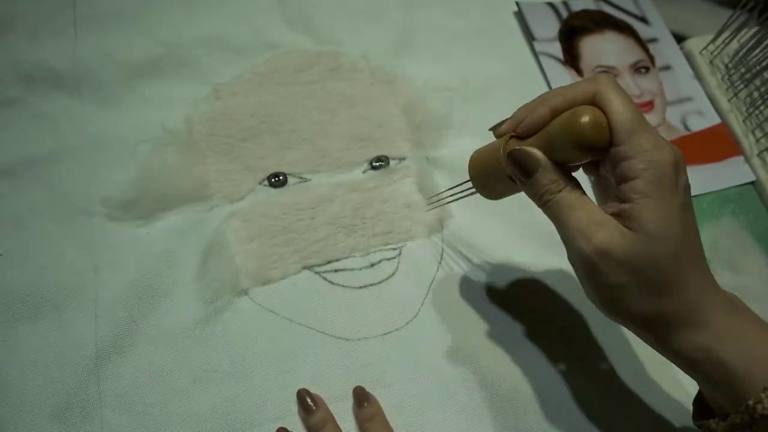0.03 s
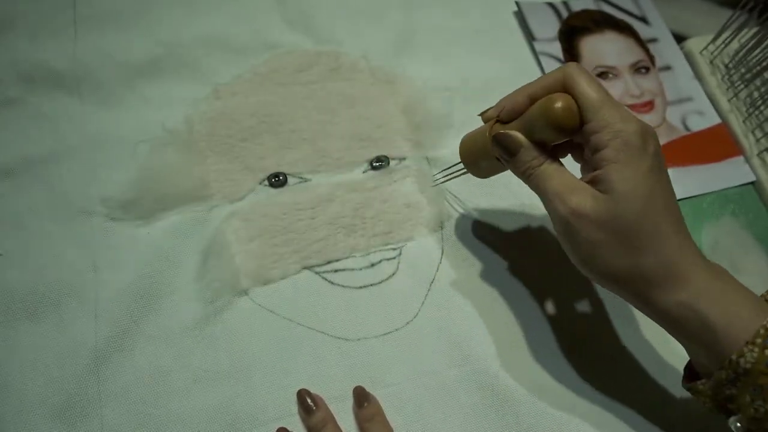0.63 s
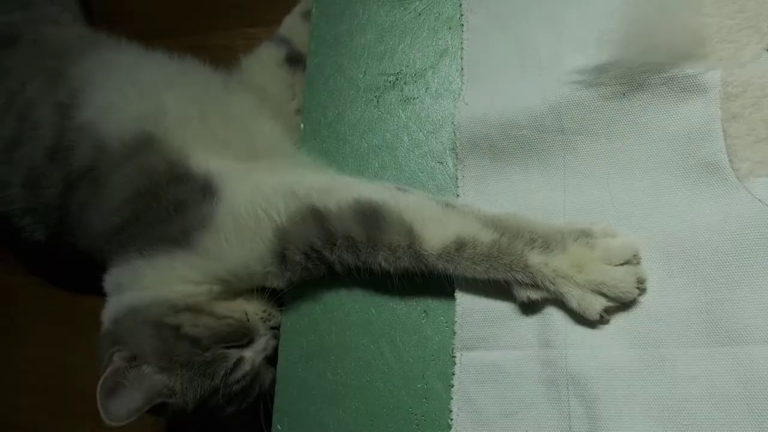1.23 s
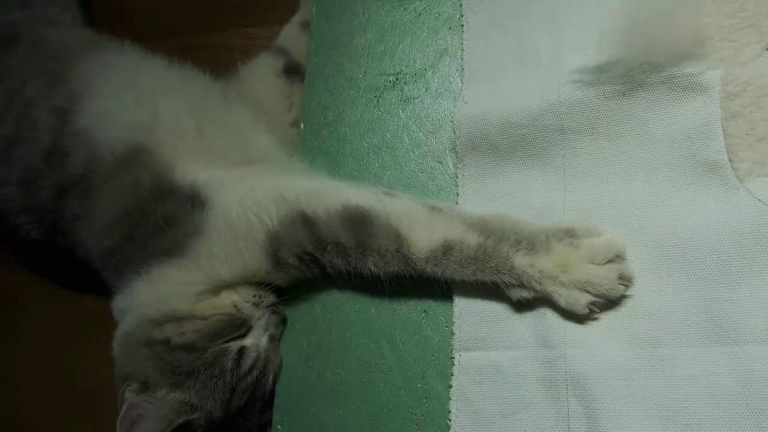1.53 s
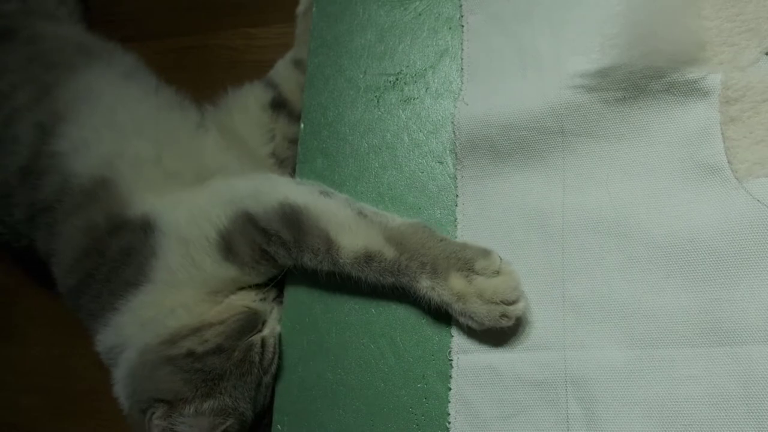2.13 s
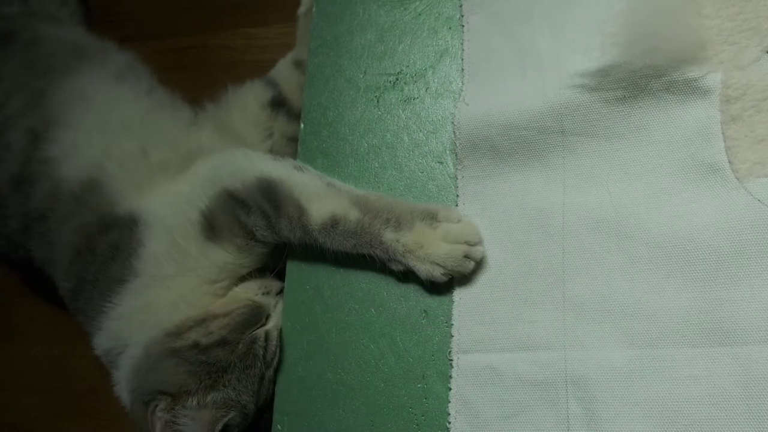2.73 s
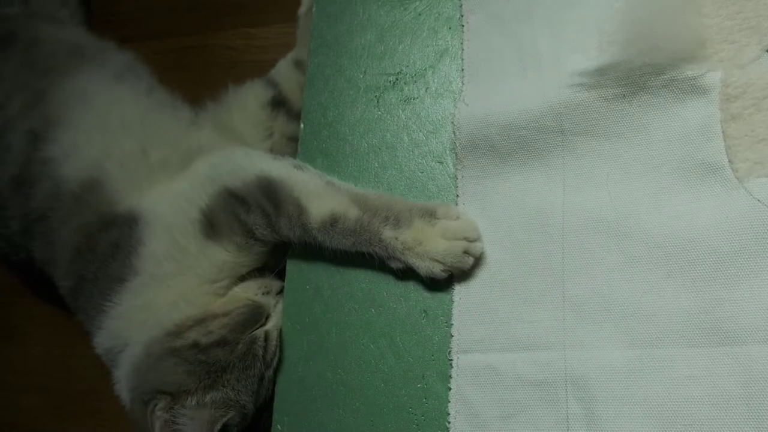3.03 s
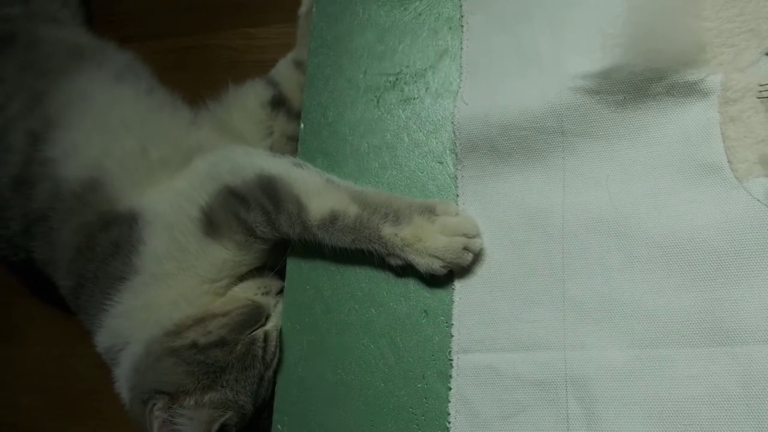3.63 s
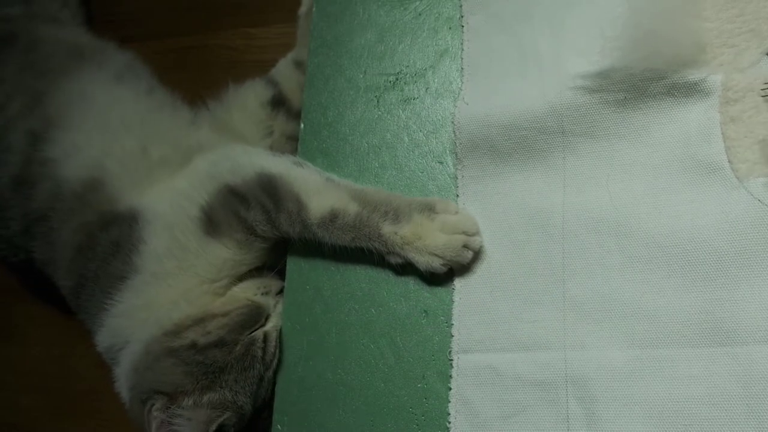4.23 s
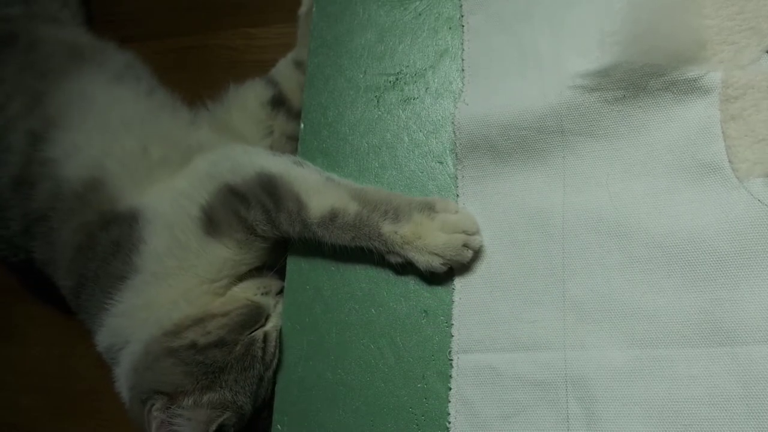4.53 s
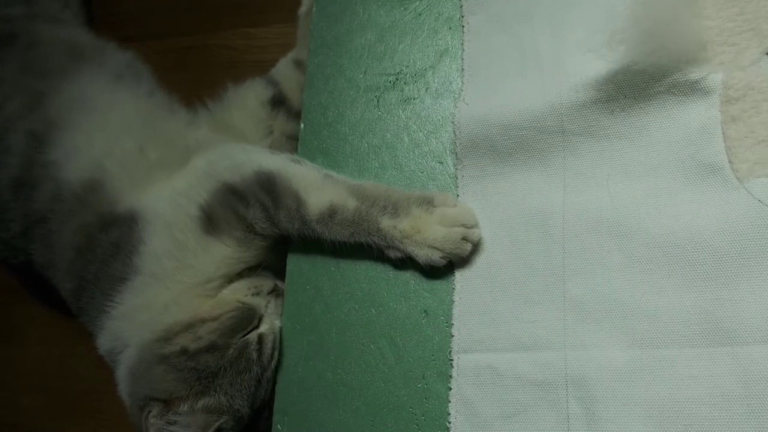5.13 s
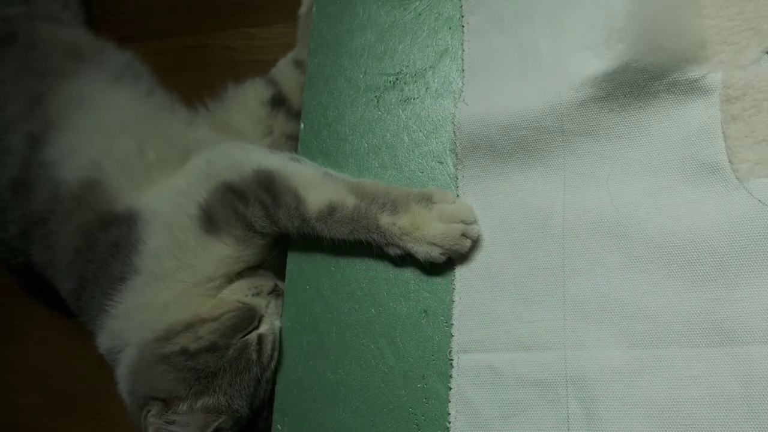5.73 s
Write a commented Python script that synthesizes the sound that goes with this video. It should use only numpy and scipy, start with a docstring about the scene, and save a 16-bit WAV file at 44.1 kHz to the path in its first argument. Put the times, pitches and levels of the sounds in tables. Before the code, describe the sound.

Close, crunchy punches of felting needles into wool and cloth on a soft pad, repeating evenly in a quiet room.

```python
"""A table in a quiet room, microphone close to a multi-needle felting tool punched through wool and cloth
into a soft pad. Over faint room noise, five sped-up, high-pitched stabs come first. Slower strokes follow:
a crunch of breaking fibres and a snap as the cloth gives, a rasp of barbs on the way out, a tick as the
needles spring free. After a second the tool moves to another spot, and the cloth shifts now and then.
A few faint squeaks come in the second half; at the end the strokes weaken and the room noise fades."""
import sys
import numpy as np
from scipy import signal
from scipy.fft import rfft, irfft
from scipy.io import wavfile

SR = 44100
rng = np.random.default_rng(int(sys.argv[2]) if len(sys.argv) > 2 else 0)


def inscribe(sig):
    """Save sig as 16-bit PCM at rate SR to the path in sys.argv[1].

    A 1-D sig is mono; a 2-D sig holds one channel per row.
    Samples are clipped to [-1, 1] before scaling.
    """
    pcm = np.round(np.clip(np.atleast_2d(sig).T, -1, 1) * 32767)
    wavfile.write(sys.argv[1], SR, pcm.astype(np.int16))


N = 264600
T = np.arange(N) / SR
NEW_SPOT_S = 1.11  # the tool moves from the first spot on the pad to the second

# Levels in the tables are relative; each source sets its own gain.
# colour of the room noise and the walls' tail: f/Hz, level/dB
ROOM_COLOUR = [(25, -12), (100, -8.5), (200, -5.5), (300, -4), (400, -2), (550, -3), (800, 0.5), (1100, -5),
               (1600, -15.5), (2400, -21), (5000, -22.5), (9000, -24.5), (15500, -27.5)]
# the quick stabs: first t/s, spacing/s, level/dB of each
QUICK_START_S, QUICK_EVERY_S, QUICK_DB = 0.0206, .0615, [-30.5, -30.5, -29.5, -28.5, -30.5]
# colour of the sped-up, high-pitched stabs: f/Hz, level/dB
QUICK_STAB_COLOUR = [(30, -35), (130, -36), (230, -22), (310, -19), (600, -7.5), (1000, -6.5), (1350, 0.5),
                     (2200, -3), (3200, -3.5), (4000, -10.5), (5700, -7.5), (7500, -12.5), (10000, -19),
                     (15500, -21.5)]
# resonances of the sped-up stabs: f/Hz, width/Hz, level/dB
QUICK_STAB_MODES = [(1420, 71, 2.4), (1910, 54, 1.4), (2170, 110, 3.7), (2590, 130, 6.4), (2670, 170, 4.3),
                    (2920, 18, 7.2), (3270, 27, 5), (3570, 70, 7.9), (4570, 130, 6.2), (5500, 130, 2.8)]
# colour of the barbs' hiss in the sped-up stabs: f/Hz, level/dB
QUICK_BARB_COLOUR = [(3000, -13.5), (6000, 10), (10000, -9), (15500, -11)]
# the slower strokes, in and out: start t/s, push length/s, crunch level/dB, drag level/dB
STROKES = [(0.369, 0.019, -32.5, -52), (0.575, 0.023, -31.5, -45), (0.776, 0.023, -32.5, -46.5),
           (0.968, 0.021, -32.5, -47.5), (1.365, 0.024, -38, -53), (1.622, 0.029, -35.5, -50.5),
           (1.878, 0.033, -40, -54), (2.12, 0.038, -35.5, -47), (2.358, 0.04, -38.5, -47.5),
           (2.604, 0.042, -40.5, -51.5), (2.856, 0.042, -37, -47), (3.103, .04, -36.5, -48.5),
           (3.366, 0.041, -36.5, -46.5), (3.63, 0.037, -37, -52), (3.89, 0.036, -38, -51),
           (4.132, 0.039, -37.5, -48), (4.395, 0.04, -45.5, -56), (4.644, 0.038, -38, -48),
           (4.897, 0.042, -37, -47.5), (5.143, 0.032, -38, -53.5), (5.382, 0.042, -41, -52),
           (5.628, 0.037, -44, -58), (5.872, 0.036, -49, -73.5)]
# colour of pad and table at the first spot: f/Hz, level/dB
FIRST_SPOT_COLOUR = [(30, -41), (60, -23.5), (100, -6), (180, -10.5), (300, -10.5), (450, 2), (750, -0.5),
                     (1000, -5), (1600, -3), (2100, -9.5), (2900, -17), (3800, -17), (7000, -26.5),
                     (15000, -27.5)]
# their resonances: f/Hz, width/Hz, level/dB
FIRST_SPOT_MODES = [(225, 10, 1), (442, 81, 7.6), (736, 310, 1.1), (804, 74, 3), (960, 43, 7.1),
                    (1350, 37, 1.9), (1600, 41, 1), (2580, 180, 1.9)]
# colour of pad and table at the second spot: f/Hz, level/dB
SECOND_SPOT_COLOUR = [(30, -36.5), (70, -19), (125, -9.5), (190, 1), (290, -6.5), (450, 1.5), (700, -5),
                      (980, -10), (1450, -0.5), (1760, -17), (2150, -10.5), (2800, -30.5), (5000, -38.5),
                      (15000, -47.5)]
# their resonances, also rung by every snap: f/Hz, width/Hz, level/dB
PAD_MODES = [(193.7, 24, 4.1), (361, 24, 2.7), (504, 138, 4.9), (583, 5, 2.6), (762, 210, 8.2),
             (1117, 380, 5.3), (1613, 54, 5.6), (1985, 360, 7)]
# colour of the barbs' hiss: f/Hz, level/dB
BARB_COLOUR = [(1200, -5), (2400, 7.5), (3200, 4), (3900, 4.5), (5700, 0), (7500, -7.5), (10000, -10.5),
               (15500, -7.5)]
# its resonances on the way in: f/Hz, width/Hz, level/dB
BARB_MODES = [(4000, 430, 4.7), (6250, 130, 6.9), (8180, 600, 7.1)]
# the cloth gives way clearly under a needle: t/s, level/dB
CLEAR_SNAPS = [(0.3794, -11), (0.5832, -16.5), (0.991, -18.5), (1.3798, -25), (1.8875, -21), (1.8917, -5.5),
               (1.912, -29.5), (2.3715, -19), (2.6155, -18), (2.6191, -8.5), (2.8677, -20), (3.1115, -16.5),
               (3.3785, -16.5), (3.6439, -9), (3.9015, -13), (4.1516, -24.5), (4.4037, -17.5), (4.409, -8),
               (4.6551, -19), (4.9198, -23.5), (5.1643, -19), (5.3939, -26), (5.6394, -25.5)]
# colour of a snap's thump: f/Hz, level/dB
SNAP_COLOUR = [(40, -14), (110, 0), (200, 1.5), (330, 2), (550, 6.5), (850, -6), (1400, 1), (2000, -7.5),
               (2800, -8.5), (5000, -44), (15000, -43.5)]
# colour of threads tearing in a snap: f/Hz, level/dB
THREAD_COLOUR = [(1500, -15), (2800, -5), (4300, 6.5), (6000, 1.5), (8500, -12.5), (15500, -12)]
# a needle catches and springs free clearly: t/s, level/dB
CLEAR_TICKS = [(1.2352, -59), (1.487, -47), (1.737, -38.5), (2.2558, -51), (2.749, -48), (3.004, -45),
               (3.2535, -47), (3.7679, -44), (5.0406, -43), (5.2774, -48.5)]
# colour of a needle's tick: f/Hz, level/dB
TICK_COLOUR = [(300, 2), (1500, 8.5), (2500, -5.5), (3500, -4), (4800, 0.5), (6200, -5), (8000, -10),
               (15000, -19.5)]
# brief ringing of the thin needles: f/Hz, width/Hz, level/dB
NEEDLE_MODES = [(3870, 200, 0), (4530, 220, 6.5), (5720, 300, 2)]
# cloth sliding over the pad: middle t/s, half length/s, level/dB
SLIDES = [(1.217, 0.024, -65), (1.543, 0.026, -55), (1.594, 0.039, -51.5), (1.7, .03, -57),
          (2.206, 0.018, -50)]
# colour of the sliding cloth: f/Hz, level/dB
CLOTH_COLOUR = [(100, -20), (400, 0), (620, 4), (950, 0.5), (1300, -5), (1650, -10), (2050, -4.5),
                (2700, -22.5), (4000, -25), (8000, -32), (15000, -38)]
# faint squeaks: t/s, length/s, start f/Hz, end f/Hz, level/dB
SQUEAKS = [(3.352, 0.035, 2100, 2054, -57.5), (5.282, 0.037, 413, 350, -60.5),
           (5.333, .055, 370, 425, -61.5), (5.432, 0.044, 597, 694, -62)]


def undb(db):
    """Decibels to gain."""
    return 10 ** (np.asarray(db) / 20)


def add(out, s, sound):
    """Mix a sound in from time s."""
    i = max(int(s * SR), 0)
    out[i:i + len(sound)] += sound[:max(N - i, 0)]


def response(colour, modes=(), pitch=1, size=4096):
    """Causal impulse response of unit energy from a smooth spectrum and its resonances."""
    hz = np.maximum(np.fft.rfftfreq(size, 1 / SR), 1) / pitch
    colour_hz, colour_db = np.transpose(colour)
    db = np.interp(np.log(hz), np.log(colour_hz), colour_db)
    for centre, width, peak_db in modes:
        db = db + peak_db / (1 + (2 * (hz - centre) / width) ** 2)
    cepstrum = irfft(np.log(undb(db)))[:size // 2]
    cepstrum[1:] *= 2  # minimum phase
    ring = irfft(np.exp(rfft(cepstrum, size)))[:size // 2]
    return ring / np.linalg.norm(ring)


def through(force, ring):
    """Play a force through an impulse response."""
    return signal.fftconvolve(force, ring)[:N]


def waver(step_s):
    """A random level that glides to a new value every step."""
    knots = np.arange(0, N / SR + step_s, step_s)
    return np.interp(T, knots, rng.standard_normal(N)[:len(knots)])


def fibres(rate, spread_db):
    """Tiny slips of random size at a mean rate per second; rms 1."""
    slips = (rng.random(N) < rate / SR) * rng.choice([-1, 1], N)
    slips = slips * undb(spread_db * np.clip(rng.standard_normal(N), -2, 2))
    return slips / np.std(slips)


def push(s, length, rise_s, fall_s, sag_db):
    """Friction of one stab: it builds smoothly, sags as the hand slows, and dies when the needles stop."""
    t = np.arange(int((length + 10 * fall_s) * SR)) / SR
    build = np.sin(np.pi / 2 * np.minimum(t / rise_s, 1)) ** 2
    sag = undb(sag_db * (np.minimum(t / length, 1) - .5))
    stop = np.exp(-np.maximum(t - length, 0) / fall_s)
    out = np.zeros(N)
    add(out, s, build * sag * stop)
    return out


def swell(s, half_s):
    """A bell-shaped rise and fall around time s."""
    t = np.arange(int(6 * half_s * SR)) / SR - 3 * half_s
    out = np.zeros(N)
    add(out, s + t[0], np.exp(-(t / half_s) ** 2))
    return out


def room(quick_end_s=.305, dip_s=0.35, dip_db=-18.5, fade_from_s=5.35, fade_db_per_s=28):
    """Soft, wavering room noise, pitched up under the quick stabs; it dips once and fades at the end."""
    low = through(rng.standard_normal(N), response(ROOM_COLOUR))
    high = through(rng.standard_normal(N), response(ROOM_COLOUR, pitch=4))
    dip = np.interp(T - NEW_SPOT_S, [0, dip_s], [dip_db, 0], left=0)
    fade = fade_db_per_s * np.maximum(T - fade_from_s, 0)
    level = undb(-61.5 + dip - fade - waver(step_s=0.17))
    return level * np.where(T < quick_end_s, undb(1.4) * high, low)


def quick_stabs(length_s=0.0081, lead_s=0.0011, pull_after_s=0.028):
    """The in-and-out stroke sped up about fourfold, and so higher: fibres crunch, then barbs hiss."""
    strokes = [(QUICK_START_S + QUICK_EVERY_S * k, db) for k, db in enumerate(QUICK_DB)]
    force = sum(undb(db) * push(s - lead_s, length_s, rise_s=0.0052, fall_s=0.0027, sag_db=-7)
                for s, db in strokes)
    drag = sum(undb(db) * swell(s + pull_after_s, half_s=0.0069) for s, db in strokes)
    slips = (force + undb(-19) * drag) * fibres(rate=12000, spread_db=4)
    crunch = through(slips, response(QUICK_STAB_COLOUR, QUICK_STAB_MODES))
    barbs = through(drag * fibres(rate=15000, spread_db=3), response(QUICK_BARB_COLOUR))
    return undb(1.5) * crunch + undb(-30.5) * barbs


def pad(force):
    """The pad rings with the modes of the spot that is being worked."""
    first = through(force * (T < NEW_SPOT_S), response(FIRST_SPOT_COLOUR, FIRST_SPOT_MODES))
    second = through(force * (T >= NEW_SPOT_S), response(SECOND_SPOT_COLOUR, PAD_MODES))
    return first + second


def stabs(lead_s=0.0034, first_barb_db=-16, second_barb_db=-18.5):
    """Barbs tear through fibres: fine slips hiss at first touch, coarse ones shake the loaded pad."""
    force = sum(undb(db) * push(s - lead_s, length + lead_s, rise_s=0.017, fall_s=0.0093, sag_db=-6)
                for s, length, db, _ in STROKES)
    rub = sum(undb(db) * push(s - lead_s, length + lead_s, rise_s=0.0089, fall_s=0.009, sag_db=-4.5)
              for s, length, db, _ in STROKES)
    crunch = pad(force * fibres(rate=2400, spread_db=2))
    barb_db = np.where(T < NEW_SPOT_S, first_barb_db, second_barb_db)
    catch = undb(barb_db + 0.71 * waver(step_s=0.0018))  # the barbs catch and slip in bunches
    barbs = through(catch * rub * fibres(rate=3200, spread_db=5.5), response(BARB_COLOUR, BARB_MODES))
    return undb(1.49) * crunch + barbs


def echoes(tool, table_s=0.003383, table_db=-15, walls_s=.012, tail_t60_s=0.52, tail_db=-33):
    """The table top throws the sound straight back at the microphone; the walls add a faint, dull tail."""
    table = np.interp(T - table_s, T, tool, left=0)
    t = np.arange(SR // 2) / SR
    scatter = rng.standard_normal(len(t)) * (t > walls_s) * undb(-60 * t / tail_t60_s)
    tail = signal.fftconvolve(scatter, response(ROOM_COLOUR))
    walls = through(tool, tail / np.linalg.norm(tail))
    return undb(table_db) * table + undb(tail_db) * walls


def soft_snaps(count=2, after_s=.008, window_s=0.019, lift_db=6.5, scatter_db=3.5):
    """Single needles break through at chance moments of each push; returns rows of t/s, level/dB."""
    chance = rng.random((len(STROKES), count, 2))
    return [(s + after_s + window_s * when, db + lift_db + scatter_db * (2 * size - 1))
            for (s, _, db, _), needles in zip(STROKES, chance) for when, size in needles]


def snaps(slip_s=0.000358, load=0.59, tear_s=0.00091):
    """The stretched cloth tugs the pad and lets go a moment later, amid a burst of tearing threads."""
    ring = response(SNAP_COLOUR, PAD_MODES)
    t = np.arange(len(ring)) / SR
    release = np.interp(t - slip_s, t, ring, left=0)
    pop = load * ring - release
    middle = t[-1] / 2
    thump, tear = np.zeros((2, N))
    for s, db in list(CLEAR_SNAPS) + soft_snaps():
        add(thump, s, undb(db) * pop / np.abs(pop).max())
        add(tear, s - middle, undb(db) * np.exp(-np.abs(t - middle) / tear_s))
    threads = through(tear * fibres(rate=14000, spread_db=5), response(THREAD_COLOUR))
    crunch = pad(tear * fibres(rate=8000, spread_db=-2.5))
    return undb(-3) * thump + undb(-31.5) * threads + undb(-13.5) * crunch


def pull_time(s, length, turn_s=0.057, pull_per_push=1.36):
    """Middle of the way out: the hand turns round, then draws back; a longer push takes longer to undo."""
    return s + turn_s + pull_per_push * length


def pulls(hiss_lag_s=0.0061):
    """The needles drag softly back out; the barbs hiss longest."""
    middles = [(pull_time(s, length), db) for s, length, _, db in STROKES]
    force = sum(undb(db) * swell(s, half_s=0.023) for s, db in middles)
    rub = sum(undb(db) * swell(s + hiss_lag_s, half_s=0.022) for s, db in middles)
    thin_bass = signal.butter(1, 380, "high", fs=SR, output="sos")  # lifting presses less on the pad
    drag = signal.sosfilt(thin_bass, pad(force * fibres(rate=1600, spread_db=3)))
    barbs = through(rub * fibres(rate=6000, spread_db=2), response(BARB_COLOUR))
    return undb(1) * drag + undb(-13) * barbs


def ticks(decay_s=0.0014, free_after_s=0.0263):
    """The needle tips leave the cloth within a few milliseconds of each other and ring."""
    age = np.arange(int(10 * decay_s * SR)) / SR / decay_s
    faint_ticks = [(pull_time(s, length) + free_after_s, db - 3) for s, length, _, db in STROKES]
    force = np.zeros(N)
    for s, db in list(CLEAR_TICKS) + faint_ticks:
        add(force, s, undb(db) * age * np.exp(1 - age))
    return undb(-3) * through(force * fibres(rate=7000, spread_db=1.5), response(TICK_COLOUR, NEEDLE_MODES))


def slides():
    """The cloth shifts between stabs, thread catching on thread."""
    force = sum(undb(db) * swell(s, half_s) for s, half_s, db in SLIDES)
    return through(force * fibres(rate=900, spread_db=0.5), response(CLOTH_COLOUR))


def squeaks():
    """Brief, nearly pure gliding tones."""
    out = np.zeros(N)
    for s, length, start_hz, end_hz, db in SQUEAKS:
        hz = np.linspace(start_hz, end_hz, int(length * SR))
        tone = np.sqrt(2) * np.sin(2 * np.pi * np.cumsum(hz) / SR)
        add(out, s, undb(db) * signal.windows.tukey(len(hz), .5) * tone)
    return out


def scene():
    """One close microphone: the tool in front, the room faint behind it."""
    tool = stabs() + snaps() + pulls() + slides() + ticks()
    return (tool + echoes(tool) + quick_stabs() + squeaks() + room())[None]


def record(dry, top_hz=16000):
    """A steep low-pass after the microphone cuts the highest treble."""
    return signal.sosfilt(signal.ellip(10, .2, 70, top_hz, fs=SR, output="sos"), dry)


dry = scene()
out = record(dry)
inscribe(out)
```